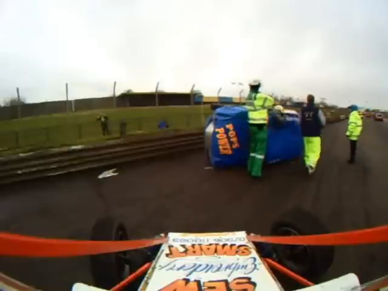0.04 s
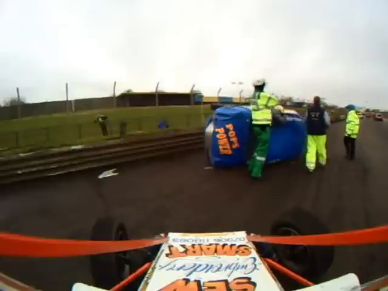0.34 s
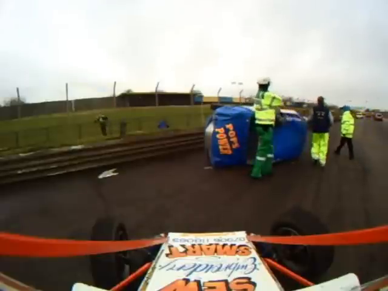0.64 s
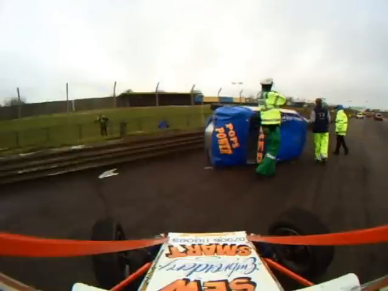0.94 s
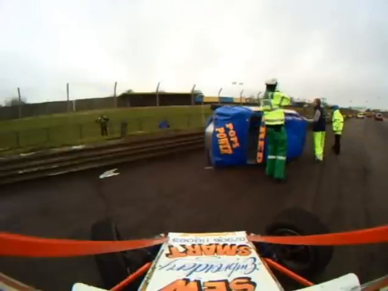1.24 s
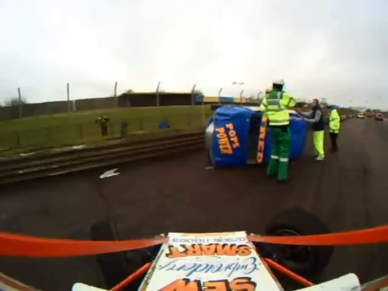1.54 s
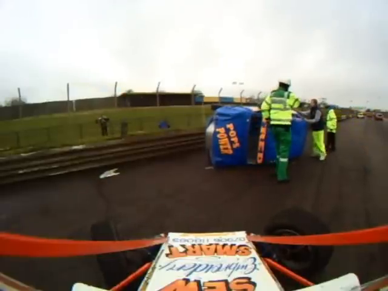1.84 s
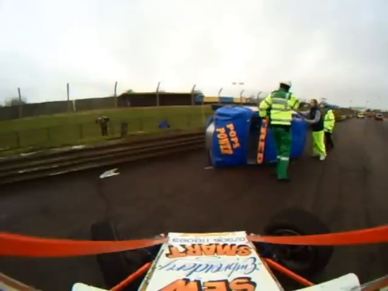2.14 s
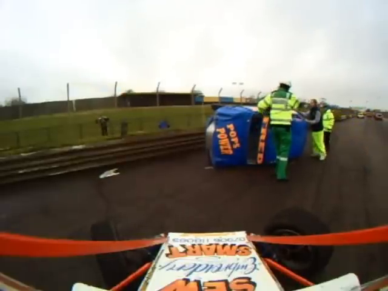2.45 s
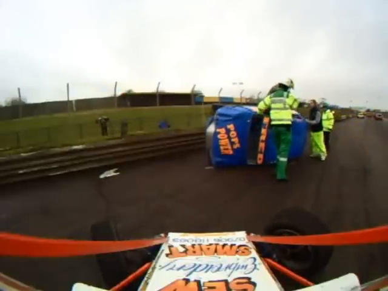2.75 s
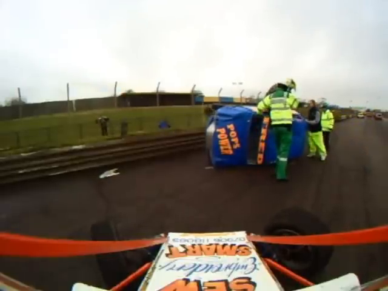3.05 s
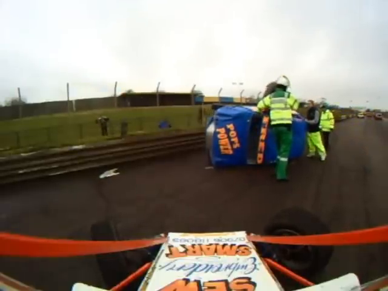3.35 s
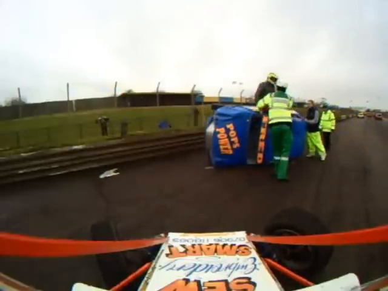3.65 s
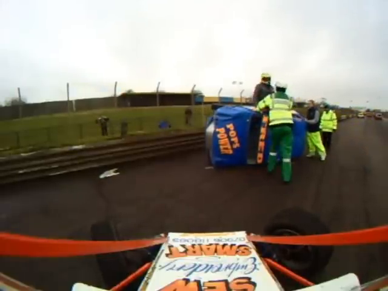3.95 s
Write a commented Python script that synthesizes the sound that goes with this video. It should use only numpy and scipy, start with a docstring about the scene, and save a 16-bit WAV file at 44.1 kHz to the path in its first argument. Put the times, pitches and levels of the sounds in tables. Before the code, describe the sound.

A stationary race car idles with a rough, lumpy pulse, heard through a dull-sounding microphone mounted on the car. Irregular sharp firings knock and crackle with distortion over continuous mechanical clatter and a thin, steady whine.

```python
"""A lumpy, rasping throb: a small race car idling, heard from a camera on its own frame.
The exhaust sounds low harmonics of the crank rotation and surges on hard firings;
the valve gear clatters and a thin metallic tone whines above it.
The throb overloads the camera's narrow-band input, whose steepest swings overflow into a crackle."""
import sys
import numpy as np
from scipy import signal
from scipy.fft import rfft, irfft
from scipy.io import wavfile

SR = 44100
rng = np.random.default_rng(int(sys.argv[2]) if len(sys.argv) > 2 else 0)


def master(y):
    """Save y as 16-bit WAV."""
    cut = np.clip(np.atleast_2d(y).T, -1, 1)
    pcm = np.round(cut * 32767)  # scale
    wavfile.write(sys.argv[1], SR, pcm.astype(np.int16))


N = 176400
T = np.arange(N) / SR
INPUT_RATE_HZ = 8000  # sample rate of the camera's sound input


def from_db(db):
    """Amplitude ratio of a level in decibels."""
    return 10 ** (np.asarray(db) / 20)


def rms_one(x):
    """Normalisation to unit power."""
    return x / np.sqrt(np.mean(x ** 2) + 1e-20)


def drift(rate_hz):
    """Slow random fluctuation: low-passed noise with a spread of 1."""
    step, settling = 40, 2000
    pole = np.exp(-2 * np.pi * step * rate_hz / SR)
    white = rng.standard_normal(N // step + settling + 2)
    slow = signal.lfilter([1], [1, -2 * pole, pole * pole], white)[settling:]
    return np.interp(np.arange(N) / step, np.arange(len(slow)), rms_one(slow))


def band_noise(low_hz, high_hz, order=2):
    """Band-limited noise of unit power."""
    bandpass = signal.butter(order, [low_hz, high_hz], "band", fs=SR, output="sos")
    return rms_one(signal.sosfilt(bandpass, rng.standard_normal(N + SR))[SR:])


def coloured_noise(spectrum):
    """Spectral shaping: unit-power noise with a smooth envelope, up to the input's Nyquist frequency."""
    hz, db = np.transpose(spectrum)
    bins_hz = np.maximum(np.arange(N // 2 + 1) * SR / N, 1)
    gain = from_db(np.interp(np.log(bins_hz), np.log(hz), db)) * (bins_hz < INPUT_RATE_HZ / 2)
    return rms_one(irfft(rfft(rng.standard_normal(N)) * gain, N))


def whine(pitch_hz=2274, wander_hz=3, level_db=-34):
    """A thin metallic tone: a sinusoid under slight random frequency modulation."""
    hz = pitch_hz + wander_hz * drift(rate_hz=6)
    return from_db(level_db) * np.sin(2 * np.pi * np.cumsum(hz) / SR)


# Spectral envelope of the clatter: frequency_hz, relative_density_db
CLATTER_SPECTRUM = [(150, 8), (300, 10), (500, -5), (900, -5), (1300, -5), (1800, -3.5), (2400, 0.5),
                    (3000, -7), (3900, -6)]
# Resonances of engine parts: pitch_hz, bandwidth_hz, level_db
METAL_RESONANCES = [(501.2, 20, -42.5), (1760, 55, -41.5), (2300, 120, -42), (2503, 55, -38.5)]


def valve_gear(turns, clatter_db=-30.5, swing_db=1.0):
    """Broadband clatter and noise-driven resonances, amplitude-modulated twice per crank turn."""
    ringing = sum(from_db(db) * band_noise(hz - width / 2, hz + width / 2, order=1)
                  for hz, width, db in METAL_RESONANCES)
    clatter = from_db(clatter_db) * coloured_noise(CLATTER_SPECTRUM)
    return (clatter + ringing) * from_db(swing_db * np.cos(2 * np.pi * 2 * turns))


# Wavering idle speed: time_s, speed_rpm
CRANK_SPEED = [(0.0, 1305), (0.3, 1300), (0.6, 1319), (0.85, 1290), (1.0, 1290), (1.25, 1324), (1.5, 1307),
               (1.75, 1306), (2.0, 1304), (2.3, 1298), (2.6, 1317), (2.9, 1305), (3.15, 1295), (3.4, 1290),
               (3.7, 1283), (4.0, 1308)]


def crank(start_turns=.61):
    """Crank angle in turns: phase is the time integral of rotational speed."""
    time_s, rpm = np.transpose(CRANK_SPEED)
    return start_turns + np.cumsum(np.interp(T, time_s, rpm)) / (60 * SR)


# Runs of hard firings: start_s, length_s, strength_db
HARD_FIRING_RUNS = [(0.154, 0.034, -18.5), (0.201, 0.021, -22), (0.245, 0.026, -23.5),
                    (0.424, 0.089, -16.5), (0.515, 0.036, -16), (0.614, 0.079, -16), (0.699, 0.044, -20),
                    (0.803, 0.051, -21), (0.884, 0.032, -23), (0.943, 0.036, -21), (0.989, 0.035, -22.5),
                    (1.062, 0.042, -14), (1.106, 0.055, -19.5), (1.245, 0.047, -20.5), (1.38, 0.047, -15),
                    (1.422, 0.081, -14.5), (1.514, 0.08, -19), (1.628, 0.022, -25.5), (1.7, 0.036, -19.5),
                    (1.806, 0.14, -17), (1.995, 0.037, -20), (2.081, 0.037, -16.5), (2.164, 0.092, -17.5),
                    (2.259, 0.055, -21), (2.438, 0.047, -15), (2.493, 0.029, -15.5), (2.546, 0.025, -23),
                    (2.592, 0.03, -15), (2.629, 0.032, -17.5), (2.677, 0.04, -20.5), (2.721, 0.042, -17.5),
                    (2.803, 0.077, -21), (2.894, 0.056, -18.5), (2.988, 0.17, -14), (3.338, 0.023, -37),
                    (3.376, 0.024, -19), (3.561, 0.033, -24), (3.664, 0.022, -21.5), (3.742, 0.039, -17),
                    (3.786, 0.028, -19.5), (3.939, 0.075, -21.5)]


def surging(full_db=-15, edge_s=.006, db_scale=.4):
    """Trapezoidal envelopes of hard firing: 0 at plain idle, 1 at full_db, with the range compressed."""
    surge = np.zeros(N)
    for start_s, length_s, strength_db in HARD_FIRING_RUNS:
        inside_s = np.minimum(T - start_s, start_s + length_s - T)
        gate = np.clip(.5 + inside_s / edge_s, 0, 1)
        surge = np.maximum(surge, from_db(db_scale * (strength_db - full_db)) * gate)
    return surge


# Single sharp firings that jolt the whole engine: peak_s, strength_db
SHARP_FIRINGS = [(0.0802, -5), (0.1695, -1), (0.2155, -4), (0.3077, -9), (0.3536, -4.5), (0.401, -5.5),
                 (0.5725, -8), (0.7563, -9), (0.9548, -3), (1.1977, -7), (1.22, -4), (1.3233, -5.5),
                 (1.3637, -4), (1.631, -8), (1.7683, -9), (2.1283, 3), (2.3237, -11), (2.367, -13),
                 (2.411, -14), (2.7773, -11), (3.2023, -4.5), (3.347, -15), (3.481, -7.5), (3.5351, -4.5),
                 (3.6051, -3.5), (3.6691, 0.5), (3.7077, -8.5), (3.8444, -7), (3.9464, 0)]


def knocking(full_db=-6, sigma_s=.003):
    """Transient envelopes: a Gaussian pulse per sharp firing, of height 1 at full_db and 2 at most."""
    return sum(min(from_db(strength_db - full_db), 2) * np.exp(-.5 * ((T - peak_s) / sigma_s) ** 2)
               for peak_s, strength_db in SHARP_FIRINGS)


# Exhaust harmonics: multiple_of_crank_speed, level_db, surge_boost_db
EXHAUST_HARMONICS = [(2, -6, 3), (3, -11, 11.5)]


def exhaust(turns, surge, uneven_db=.5, overtone_db=-23, overtone_surge_db=9, lag_s=.0038,
            rumble_db=-20.5):
    """Periodic firing gives harmonics of the crank rotation, stronger in a surge, over a dull rumble."""
    throb = np.zeros(N)
    for multiple, level_db, boost_db in EXHAUST_HARMONICS:
        amplitude = from_db(level_db + boost_db * surge + uneven_db * drift(rate_hz=14))
        throb -= amplitude * np.cos(2 * np.pi * multiple * turns)
    # Two firings per turn; the octave of the firing rate trails the throb.
    firings = 2 * np.interp(T - lag_s, T, turns)
    overtone = -from_db(overtone_db + overtone_surge_db * surge) * np.cos(2 * np.pi * 2 * firings)
    rumble = from_db(rumble_db) * band_noise(low_hz=54.8, high_hz=169.85)
    return throb + overtone + rumble


def scene(surge_per_knock=.45, throb_lift_db=6.5, clatter_lift_db=7):
    """Superposition at the microphone; each sharp firing lifts exhaust and valve gear together."""
    turns, knock = crank(), knocking()
    surge = np.maximum(surging(), surge_per_knock * knock)
    throb = exhaust(turns, surge) * from_db(throb_lift_db * knock)
    clatter = valve_gear(turns) * from_db(clatter_lift_db * knock)
    return (throb + clatter + whine())[None]


def record(dry, input_limit=.46, overflow_limit=.5, output_limit=.505, bass_cut_hz=70, cutoff_hz=16000):
    """Overload distortion: clipping and overflow in the camera's input (limits in full-scale units)."""
    clipped = np.clip(dry, -input_limit, input_limit)
    narrow = signal.resample_poly(clipped, INPUT_RATE_HZ, SR, axis=1)
    # The high-pass overshoots on steep swings; samples past the limit jump to a set value and crackle.
    thinned = signal.lfilter(*signal.butter(1, bass_cut_hz, "high", fs=INPUT_RATE_HZ), narrow)
    wrapped = np.where(thinned > overflow_limit, .02, thinned)
    wrapped = np.where(thinned < -overflow_limit, .3, wrapped)
    # Band-limited interpolation rings at the jumps, and its overshoots clip again.
    upsampling = 441  # SR / INPUT_RATE_HZ = 441 / 80
    kernel = signal.firwin(upsampling * 48 + 1, .97 / upsampling, window=("kaiser", 7))
    smooth = signal.resample_poly(wrapped, SR, INPUT_RATE_HZ, axis=1, window=kernel)[:, :N]
    lowpass = signal.ellip(10, .1, 70, cutoff_hz, fs=SR, output="sos")
    return signal.sosfilt(lowpass, np.clip(smooth, -output_limit, output_limit))


dry = scene()
out = record(dry)
master(out)
```